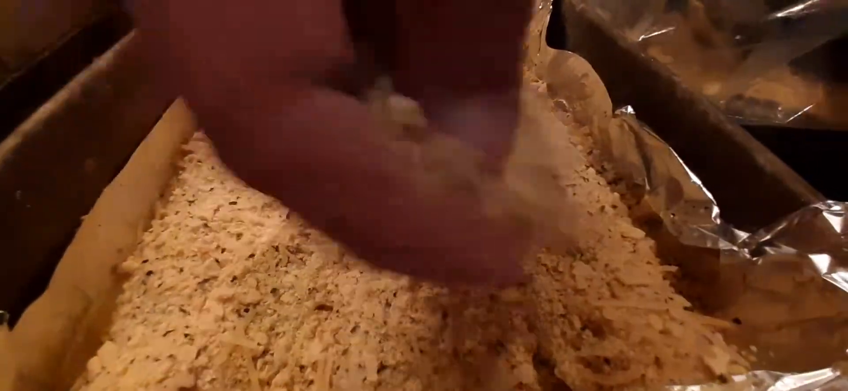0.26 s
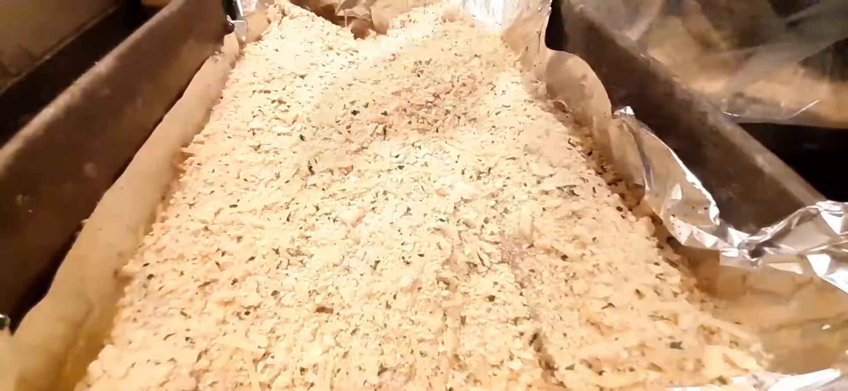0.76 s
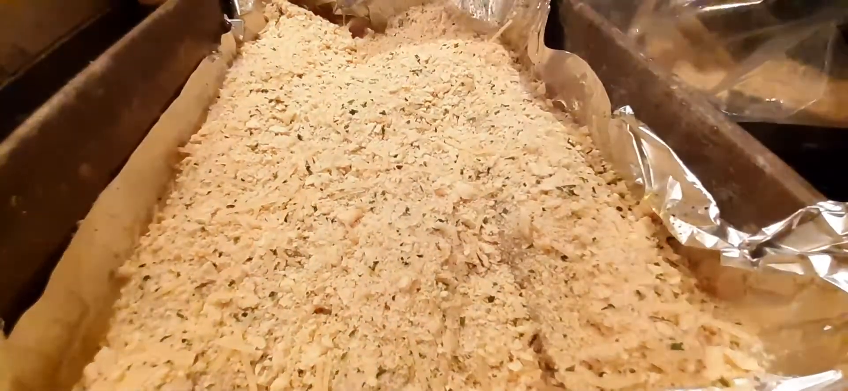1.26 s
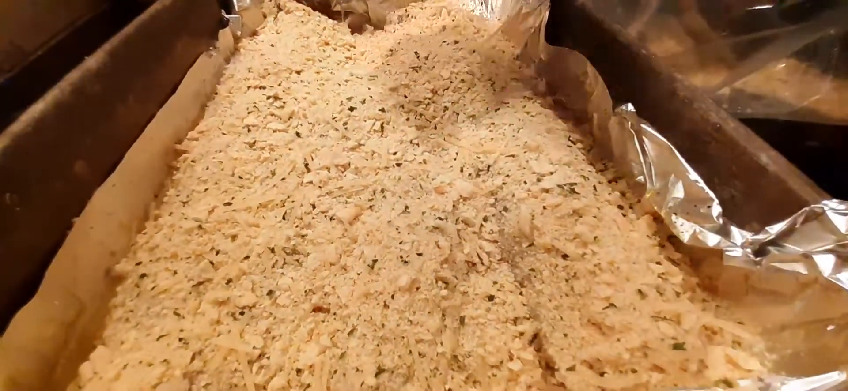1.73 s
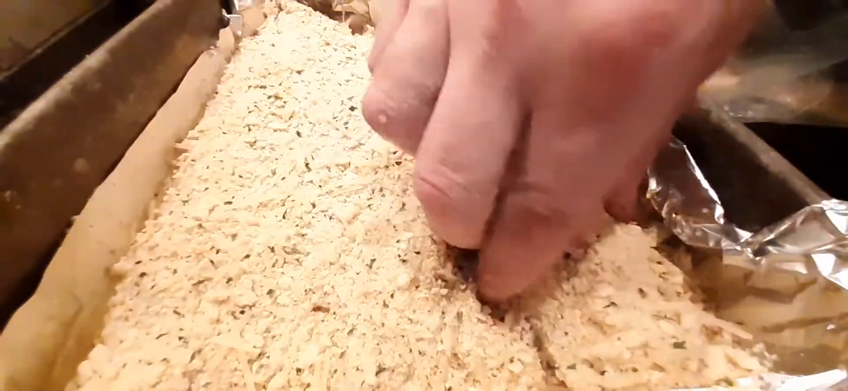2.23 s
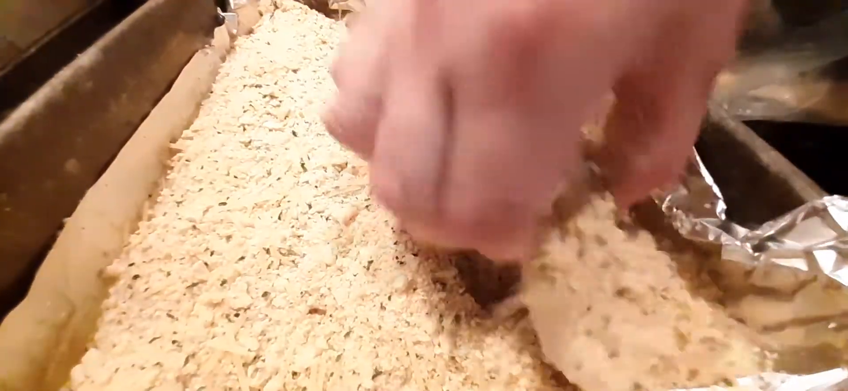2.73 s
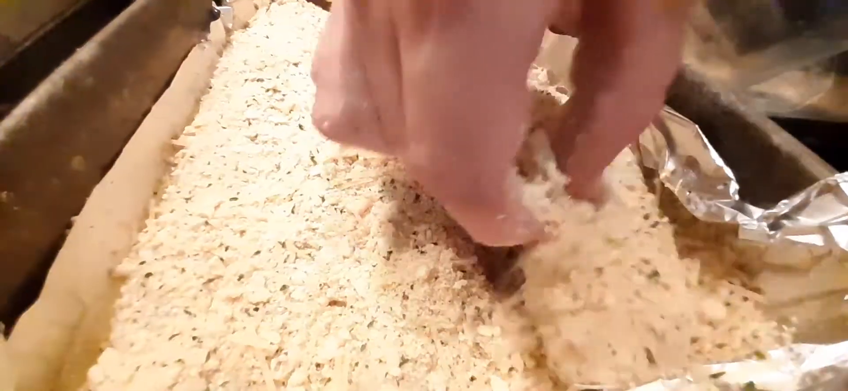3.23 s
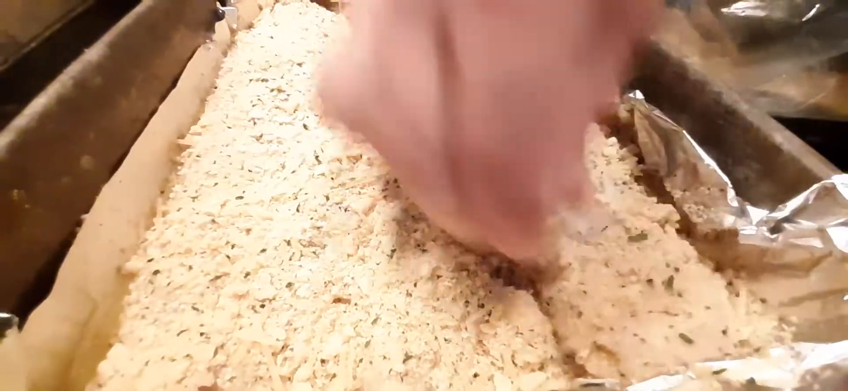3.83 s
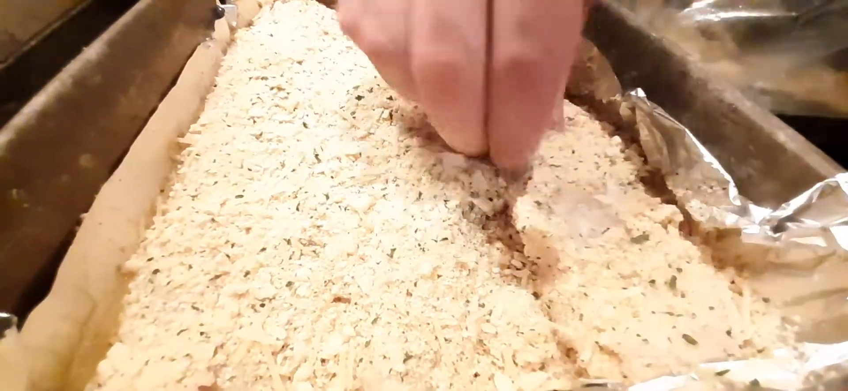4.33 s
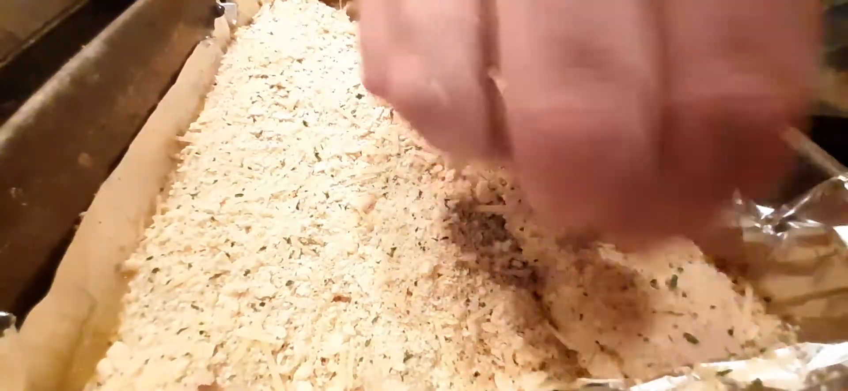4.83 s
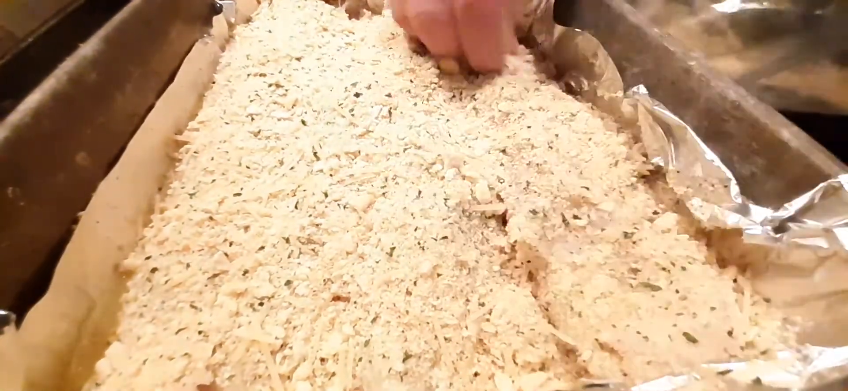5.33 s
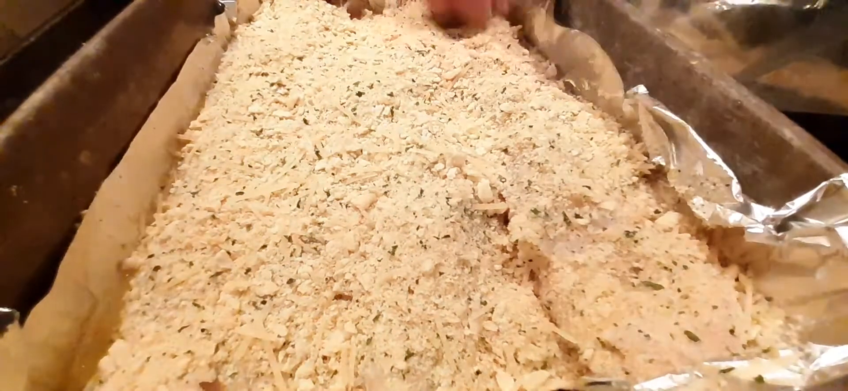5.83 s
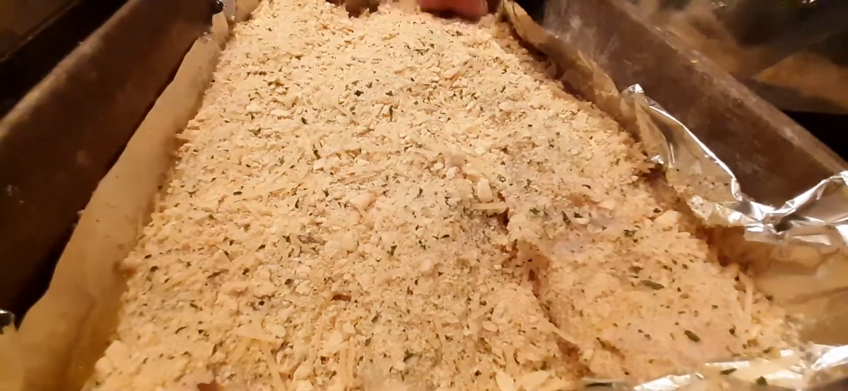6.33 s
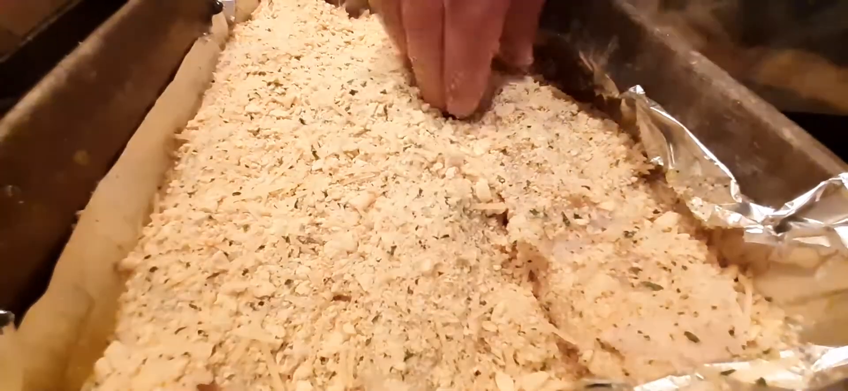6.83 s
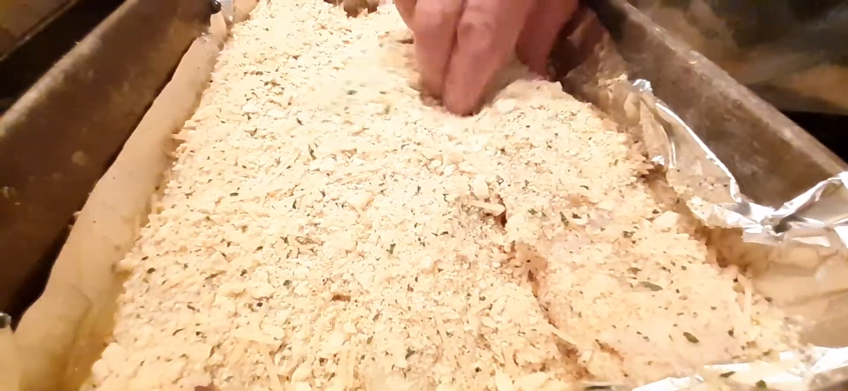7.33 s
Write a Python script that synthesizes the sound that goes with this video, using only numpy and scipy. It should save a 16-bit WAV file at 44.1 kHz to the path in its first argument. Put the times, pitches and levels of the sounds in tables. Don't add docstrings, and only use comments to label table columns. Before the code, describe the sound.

Dry crumbs crunch and crackle under a pressing hand in a foil-lined pan, with sharp snaps and pops over a low refrigerator hum.

```python
import sys
import numpy as np
from scipy import signal
from scipy.fft import rfft, irfft
from scipy.io import wavfile

SR = 44100
rng = np.random.default_rng(int(sys.argv[2]) if len(sys.argv) > 2 else 0)


def wrap_up_sound(samples):
    columns = np.atleast_2d(samples).T
    tamed = np.clip(columns, -1, 1)
    steps = np.round(tamed * 32767).astype(np.int16)
    wavfile.write(sys.argv[1], SR, steps)


def invert_db(x):
    u = np.asarray(x, float) / 20
    return 10 ** u


N = 333396
PORT_LAG, CRACK_LAG = 14, 21


def rms_one(x):
    return x / np.sqrt(np.mean(x ** 2) + 1e-20)


def in_time(rows):
    s, *columns = np.transpose(rows)
    return [np.interp(np.arange(N) / SR, s, c) for c in columns]


def at_hz(points, hz):
    pitch, value = np.transpose(points)
    return np.interp(np.log(hz), np.log(pitch), value)


def sides(pan_db):
    return invert_db(np.array([pan_db / 2, -pan_db / 2]))


def place(x, pan_db):
    return x * sides(pan_db)[:, None]


def arrive(out, sound, s, pan_db, lag):
    for port, gain in enumerate(sides(pan_db)):
        i = round(s * SR + port * lag)
        out[port, i:i + len(sound)] += gain * sound


def drift(rate):
    r = np.exp(-80 * np.pi * rate / SR)
    chance = rng.standard_normal(N // 40 + 2002)
    slow = signal.lfilter([1], [1, -2 * r, r * r], chance)[2000:]
    return np.interp(np.arange(N) / 40, np.arange(len(slow)), rms_one(slow))


def resonate(x, hz, width):
    r = np.exp(-np.pi * width / SR)
    poles = [1, -2 * r * np.cos(2 * np.pi * hz / SR), r * r]
    return signal.lfilter([(1 - r * r) / 2, 0, (r * r - 1) / 2], poles, x + 1e-18)


def colour(x, spectrum):
    hz = np.fft.rfftfreq(4096, 1 / SR) + 1
    cepstrum = irfft(np.log(invert_db(at_hz(spectrum, hz))))
    cepstrum[1:2048] *= 2
    cepstrum[2049:] = 0
    kernel = irfft(np.exp(rfft(cepstrum)))
    return signal.fftconvolve(x, [kernel / np.linalg.norm(kernel)], axes=1)[:, :N]


# (frequency [Hz], correlation [-1 to 1])
LIKENESS = [(60, 0.97), (240, 0.73), (950, -0.046), (3770, -0.3), (15000, 0.24)]


def alike_noise(hz):
    mid, side = rng.standard_normal((2, N))
    alike = np.clip(at_hz(LIKENESS, hz), -1, 1)
    return np.sqrt(1 + alike) * mid + np.sqrt(1 - alike) * side * [[1], [-1]]


# (frequency [Hz], level [dB rms])
HUM = [(60, -59.5), (120, -45.5), (204, -58), (240, -56.5), (256, -56)]
# (time [s], level [dB])
HUM_SWAY = [(0.0, -47), (1.4, -45.5), (2.0, -47.5), (2.6, -46), (3.54, -45.5), (4.15, -49), (6.2, -46.5),
            (6.67, -51), (7.56, -50)]
# (frequency [Hz], width [Hz], level [dB])
FAN_TONES = [(61.3, 7.3, -52.5), (149.9, 12, -56), (441.8, 21, -58), (734, 86, -63.5), (1543, 70, -67.5),
             (2910, 380, -69), (12800, 2500, -90)]


def fridge():
    t = np.arange(N) / SR
    lines = np.zeros(N)
    for hz, db in HUM:
        tone = np.sqrt(2) * np.sin(2 * np.pi * (hz * t + rng.random()))
        lines += invert_db(db + 1.0 * drift(4.9)) * tone
    sway_db = in_time(HUM_SWAY)[0]
    out = place(lines * invert_db(sway_db - sway_db.mean()), 4.5)
    for hz, width, db in FAN_TONES:
        tone = resonate(resonate(alike_noise(hz), hz, width), hz, width)
        out = out + place(invert_db(db) * rms_one(tone), 0.25)
    return out


# (frequency [Hz], density [dB per Hz])
AIR_SPECTRUM = [(18, -46), (30, -12.5), (70, -18), (124, -9.5), (170, -11.5), (245, -8), (374, -14),
                (437, -11), (1100, -29.5), (1540, -32), (2290, -37.5), (5040, -32), (12300, -57),
                (16000, -75)]
AIR_DB = -47.5


def air():
    low, high = [signal.butter(1, 480, kind, fs=SR) for kind in ("low", "high")]
    white = signal.lfilter(*low, alike_noise(120)) + signal.lfilter(*high, alike_noise(2250))
    swell_db = 0.7 * drift(3)
    return place(invert_db(AIR_DB + swell_db + 0.4) * rms_one(colour(white, AIR_SPECTRUM)), 0.15)


# (time [s], left-right difference [dB])
HAND_SIDE = [(0, 13), (0.4, 7), (1.3, 3), (2.2, 3), (2.8, 9), (3.7, 5), (4.1, 5), (6.3, 4), (7.56, 5.5)]


def hand_side(s):
    return np.interp(s, *np.transpose(HAND_SIDE))


# (time of the top [s], crunch [dB], brightness [dB], rise [s])
SQUEEZES = [(0.116, -39.5, -51, 0.037), (0.16, -45.5, -73, 0.048), (0.418, -34, -36, 0.029),
            (1.072, -38, -49, 0.012), (1.436, -36.5, -43.5, 0.015), (1.467, -36.5, -39, 0.0075),
            (2.009, -45.5, -61, 0.029), (2.652, -31, -42.5, 0.057), (2.821, -24.5, -31.5, 0.012),
            (2.986, -28, -36, 0.015), (3.157, -26.5, -34.5, 0.025), (3.268, -43, -46, 0.03),
            (3.332, -35, -45, 0.028), (3.396, -68, -48, 0.025), (3.658, -31, -34.5, 0.064),
            (3.796, -36, -48, 0.021), (4.966, -48, -55, 0.01), (5.141, -52, -86, 0.005),
            (5.862, -27.5, -38, 0.0084), (6.335, -19, -31.5, 0.01), (7.26, -43.5, -45.5, 0.032),
            (7.361, -38.5, -41, 0.013), (7.448, -38.5, -43, 0.017)]
# (time of the top [s], crunch [dB], brightness [dB], fall [s])
BRUSHES = [(0.08, -42, -46, 0.014), (0.373, -44, -47, 0.011), (1.034, -32, -38, 0.017),
           (1.264, -46, -45.5, 0.017), (1.39, -61, -45, 0.014), (1.727, -52.5, -61, 0.088),
           (2.139, -40.5, -49.5, 0.048), (2.251, -35, -40.5, 0.0098), (3.841, -55, -57, 0.014),
           (4.222, -47, -52, 0.032), (4.474, -47, -56, 0.026), (4.68, -46, -52, 0.015),
           (4.906, -30, -37, 0.011), (5.322, -48.5, -54, 0.062), (5.605, -42, -48, 0.047),
           (5.874, -27, -32, 0.014), (5.92, -42, -52, 0.027), (6.102, -20.5, -28, 0.0091),
           (6.117, -38, -39, 0.0062), (6.14, -47, -59, 0.079), (6.341, -30.5, -31, 0.019),
           (6.72, -57, -68, 0.12), (6.854, -38.5, -48.5, 0.059), (6.975, -26.5, -36.5, 0.046),
           (7.022, -52, -53, 0.018), (7.536, -44, -53, 0.023)]


def pushes():
    squeezes = [(*row, 0.008 + 0.059 * row[3]) for row in SQUEEZES]
    brushes = [(*row[:3], 0.0076, row[3]) for row in BRUSHES]
    return squeezes + brushes


# (time [s], peak [dB], brightness [dB], ring [Hz])
SNAPS = [(0.0727, -30, -45.5, 3460), (0.098, -20, -29, 3650), (0.295, -29.5, -38, 4160),
         (0.36, -35, -23, 1500), (1.0307, -24, -43, 1900), (1.256, -23, -48, 4500), (1.388, -34, -45, 3950),
         (1.436, -38, -26.5, 3970), (1.464, -40, -38, 1860), (2.19, -29, -46, 3350),
         (2.2293, -19, -39, 5000), (2.271, -21.5, -38, 4700), (2.3327, -23.5, -38, 2950),
         (2.4502, -24, -22.5, 1890), (3.1465, -29, -32, 1870), (3.6084, -27, -37, 1900),
         (4.062, -28, -60, 4540), (4.899, -33, -35, 2030), (4.9672, -23, -30, 5200), (5.22, -31, -42, 1710),
         (5.61, -30, -38, 3280), (5.856, -18, -40, 4020), (5.8639, -19, -23.5, 2050),
         (6.0947, -21.5, -31, 2250), (6.329, -17, -15.5, 1680), (6.9672, -35, -35, 1980),
         (6.9725, -15.5, -28, 3340), (7.444, -30, -30.5, 2870), (7.4798, -26.5, -53, 2600),
         (0.362, -12.5, -42, 4440)]
# (time [s], peak [dB], brightness [dB])
POPS = [(0.0698, -32.5, -53), (0.393, -24, -29), (0.435, -21.5, -24), (1.051, -36, -44), (1.077, -26, -37),
        (2.436, -29.5, -41), (2.5155, -33, -38), (2.5592, -26, -39), (2.584, -23, -53), (2.656, -32, -52),
        (2.727, -28, -55), (2.803, -17, -56), (2.8916, -34, -59), (2.934, -30, -46), (2.9505, -22.5, -53),
        (2.985, -34, -28), (3.031, -31, -50), (3.066, -16.5, -31), (3.123, -46, -53), (3.3098, -32, -55),
        (3.3737, -48, -43), (3.3975, -27.5, -41), (3.451, -31, -41), (3.5445, -44, -30.5),
        (3.8625, -35, -32.5), (3.9995, -39, -48), (6.318, -37, -51), (6.7165, -46, -68), (7.246, -36, -62),
        (7.358, -22.5, -45)]
POP_HZ, POP_SPREAD = 1930, 0.07


def breaks():
    chance = rng.standard_normal((len(SNAPS) + len(POPS), 2))
    pops = [(*row, POP_HZ * (1 + POP_SPREAD * c)) for row, c in zip(POPS, chance[:, 0])]
    side_db = -3 * chance[:, 1]
    side_db[len(SNAPS):] += 2.5
    return [(*row, hand_side(row[0]) + d) for row, d in zip([*SNAPS, *pops], side_db)]


def settle(strength, share_db, t60):
    r = invert_db(-60 / (t60 * SR))
    return strength + invert_db(share_db) * signal.lfilter([1 - r], [1, -r], strength)


def fractures(per_s, spread_db, alike):
    size_db = spread_db * np.minimum(rng.exponential(1, (2, N)), 5)
    sizes = invert_db(size_db) * rng.choice([-1, 1], (2, N))
    left, other = rms_one(sizes * (rng.random((2, N)) < per_s / SR))
    right = alike * np.roll(left, PORT_LAG) + np.sqrt(1 - alike ** 2) * other
    return np.array([left, right])


# (time [s], crunch [dB])
PRESS = [(0.0, -56), (0.15, -60), (0.51, -70.5), (1.43, -57.5), (1.77, -67), (2.12, -57), (2.32, -47.5),
         (2.65, -38), (2.78, -44), (3.03, -44), (3.26, -59.5), (3.51, -39), (3.7, -68.5), (4.48, -64.5),
         (6.55, -88), (6.93, -46), (7.07, -64.5), (7.56, -50)]
# (time [s], peak [dB])
TICKS = [(0.063, -38), (0.114, -18.5), (0.135, -23), (0.162, -28), (0.176, -31), (0.188, -42), (0.218, -46),
         (0.239, -36), (0.267, -42), (0.273, -35), (0.5482, -44), (0.939, -40), (1.31, -35), (1.3547, -38),
         (1.4185, -38), (1.533, -33), (1.724, -43), (2.1365, -51), (2.3151, -46), (2.468, -37),
         (2.7681, -37), (3.1794, -32), (3.685, -45), (3.806, -31), (3.84, -25.5), (4.8493, -39.5),
         (5.377, -36), (5.595, -38), (5.641, -34.5), (6.311, -36), (6.4031, -29), (6.5275, -45),
         (6.716, -55), (6.85, -30), (7.533, -30)]


def strengths(broken):
    press_db = in_time(PRESS)[0]
    low, high = place(invert_db(press_db - 8.5), 4.9), place(invert_db(press_db - 7), 4.9)
    for s, crunch_db, bright_db, rise, fall in pushes():
        i = np.arange(max(round((s - 0.2) * SR), 0), min(round((s + 0.4) * SR), N))
        before, past = (s - i / SR) / max(rise, 0.002), (i / SR - s) / max(fall, 0.002)
        away = np.where(i < s * SR, before, past)
        shape = place(invert_db(-6 * away ** 1.8), hand_side(s))
        low[:, i] += invert_db(crunch_db - 10.0) * shape
        high[:, i] += invert_db(bright_db - 0.36) * shape
    clumps = 1.5 * drift(30) + 1.1 * drift(200)
    low = settle(low, -6.0, 0.42) * invert_db(clumps + 1.6 * drift(110))
    high = settle(high, -9.0, 0.47) * invert_db(clumps + 2 * drift(78))
    after = np.arange(SR // 20) / SR
    for s, peak_db, bright_db, hz, side_db in broken:
        i = round(s * SR)
        shape = place(invert_db(-60 * after[:N - i] / 0.029), side_db)
        low[:, i:i + len(after)] += invert_db(peak_db - 17.0) * shape
        high[:, i:i + len(after)] += invert_db(bright_db - 5.0) * shape
    for s, peak_db in TICKS:
        i = round(s * SR)
        shape = invert_db(peak_db - 6.0 - 60 * after[:N - i] / 0.014)
        high[:, i:i + len(after)] += place(shape, hand_side(s))
    return low, high


# (frequency [Hz], density [dB per Hz])
CRUNCH = [(290, -28.5), (500, -5), (1130, -2.5), (1540, -1), (1830, -3), (2750, -0.5), (6000, -23),
          (7800, -28), (13200, -120)]
# (frequency [Hz], density [dB per Hz])
FIZZ = [(2650, -26.5), (4500, 0.5), (8540, -0.5), (12400, 0), (15100, -2), (15900, -10)]
# (frequency [Hz], width [Hz], gain [dB])
PAN_BODY = [(1430, 47, 6), (2250, 140, 3), (3300, 510, 2), (4020, 560, 10)]
# (time [s], ring [dB], weight of the hand [dB])
HOLLOW = [(0.15, -13, -13), (.36, 7, 6.5), (.44, -1, -7), (.48, 5, 7), (1.04, 1, 3), (1.3, -7, 6.5),
          (2.3, -10, 2.5), (2.58, -1.5, 0.5), (3, 5, 0), (3.2, 3, 0.5), (3.45, -6, 2), (3.66, -5, 6),
          (4.2, -1.5, 6), (5.8, -4.5, 4), (6.15, 1, 6.5), (6.4, -1, 4), (7, -7.5, 1), (7.56, -4, 2.5)]
HOLLOW_HZ, HOLLOW_WIDTH_HZ, WEIGHT_HZ = 1854, 213, 1130


def crumbs(broken):
    low, high = strengths(broken)
    grains = fractures(6000, 2.53, alike=0.1)
    body = colour(grains * low, CRUNCH)
    ring_db, weight_db = in_time(HOLLOW)
    bass = signal.filtfilt(*signal.butter(2, WEIGHT_HZ, fs=SR), body)
    body = body + (invert_db(weight_db) - 1) * bass
    hollow = place(invert_db(ring_db + 7.0) * resonate(body, HOLLOW_HZ, HOLLOW_WIDTH_HZ), -4.5)
    pan = sum((invert_db(db) - 1) * resonate(body, hz, width) for hz, width, db in PAN_BODY)
    fine = rms_one(grains * np.abs(grains) ** 0.17)
    fizz = place(colour(fine * high, FIZZ), -2)
    return invert_db(-3.0) * (body + hollow + pan) + fizz


KITCHEN_T60_S, WALL_CUT_HZ, KITCHEN_DB = 0.31, 3800, -12.5


def kitchen(x):
    after = np.arange(SR // 2) / SR
    echoes = rng.standard_normal((2, 2, SR // 2)) * (1 - np.exp(-after / 0.00036))
    low, high = [signal.butter(1, WALL_CUT_HZ, kind, fs=SR) for kind in ("low", "high")]
    dull = signal.lfilter(*low, echoes[0]) * invert_db(-60 * after / KITCHEN_T60_S)
    bright = signal.lfilter(*high, echoes[1]) * invert_db(-60 * after / (0.42 * KITCHEN_T60_S))
    tail = dull + bright
    return signal.fftconvolve([x, x], tail / np.linalg.norm(tail[0]), axes=1)[:, :N]


def snaps(broken):
    out, after = np.zeros((2, N + SR)), np.arange(SR // 40) / SR
    for s, peak_db, bright_db, hz, side_db in broken:
        where, overtone = rng.random(2)
        ring = np.sin(2 * np.pi * hz * after)
        ring += 0.5 * np.sin(2 * np.pi * hz * (1.544 + 0.35 * overtone) * after)
        ring *= invert_db(peak_db - 4 - 60 * after * hz / 18)
        arrive(out, ring, s + 0.0007, side_db, PORT_LAG * (1.2 + 0.7 * where))
    return out[:, :N]


# (time [s], peak [dB],
# ring [Hz], decay [cycles])
CRACKS = [(0.3613, -12, 1390, 9.2), (0.372, -22, 1810, 11), (0.379, -24, 1750, 18), (0.399, -26, 1850, 22),
          (0.4104, -23, 1810, 14), (0.4152, -35, 1830, 20), (0.535, -38, 1880, 16), (0.6135, -38, 1810, 12),
          (1.027, -28, 1590, 14), (1.4383, -36, 3960, 12), (1.508, -30, 3400, 12), (1.643, -46, 1050, 12),
          (1.6716, -42, 1810, 12), (2.4957, -30, 1290, 11), (2.585, -14.5, 1840, 20),
          (2.6034, -25, 1900, 15), (2.6518, -11.5, 1730, 10), (2.684, -30, 1950, 12),
          (2.7227, -18.5, 1810, 7.3), (2.813, -20, 1790, 22), (2.822, -23, 2010, 10),
          (2.9738, -19, 1880, 14), (2.9888, -22, 2180, 12), (2.993, -22, 1680, 11), (3.059, -25, 1930, 15),
          (3.1474, -26, 1850, 11), (3.158, -22, 1830, 13), (3.1822, -17, 1440, 5.1),
          (3.4256, -30, 4950, 12), (3.6324, -33, 2920, 12), (3.6548, -18.5, 1960, 18),
          (3.784, -29, 1840, 14), (4.9003, -28, 2060, 18), (4.915, -26, 1930, 18), (4.968, -31, 3900, 13),
          (5.1387, -35, 4070, 14), (5.8639, -17.5, 1620, 14), (5.879, -12.5, 1770, 10),
          (5.8866, -20, 1780, 12), (6.1004, -17, 2180, 18), (6.1064, -26, 2250, 12),
          (6.1344, -22.5, 1840, 14), (6.147, -32, 1920, 12), (6.196, -27, 1150, 12),
          (6.322, -19.5, 1770, 16), (6.4034, -28, 1850, 12), (6.443, -30, 1880, 11),
          (6.7955, -37, 2830, 15), (6.9634, -21, 1930, 12), (6.9836, -20, 2220, 15),
          (6.9964, -21, 1920, 12), (7.0136, -24, 1900, 12), (7.0255, -22, 1800, 12),
          (7.4061, -31, 1840, 12), (7.5335, -30, 2500, 11),
          (0.1, -26, 5200, 14), (0.143, -27, 3520, 15), (0.241, -31, 3000, 9.7), (0.364, -14, 3240, 10),
         (1.053, -17, 2960, 14), (2.525, -31, 2200, 10), (2.652, -15, 3360, 10), (3.07, -23, 4500, 10),
         (3.614, -15, 2840, 16), (3.626, -24, 3100, 14), (3.642, -21, 4000, 14), (3.661, -18.5, 1460, 14),
         (3.667, -21, 2000, 16), (5.111, -32, 3040, 14), (5.367, -33, 3020, 20), (6.332, -20, 4800, 14)]


def cracks():
    out, after = np.zeros((2, N + SR)), np.arange(SR // 40) / SR
    for s, peak_db, hz, cycles in CRACKS:
        turns = hz * after
        octave = 0.19 * np.cos(2 * np.pi * 2.0 * turns) * invert_db(-6 * turns)
        decay_db = -60 * (turns / np.clip(cycles, 2, 40)) ** 1.46
        ring = invert_db(peak_db - 6 + decay_db) * (np.cos(2 * np.pi * turns) + octave)
        arrive(out, ring, round(s * SR) / SR, hand_side(s), CRACK_LAG)
    band = signal.butter(3, [700, 6000], "band", fs=SR, output="sos")
    return signal.sosfilt(band, out[:, :N] + 1e-18)


# (time [s], peak [dB], centre [Hz])
CLICKS = [(0.3611, -22, 4560), (2.2293, -22, 5140), (2.3321, -38, 2860), (2.4513, -10, 12900),
          (2.4674, -29, 3730), (2.652, -23, 3190), (2.8214, -28, 3030), (3.3604, -34, 12700),
          (3.3732, -32, 4790), (3.397, -26, 3000), (3.4251, -35, 4950), (3.4804, -15, 11400),
          (3.5428, -21, 6170), (3.5804, -30, 3030), (3.6067, -24, 2620), (3.6262, -18, 2950),
          (3.6411, -26, 3030), (3.6615, -14, 3950), (3.9988, -23.5, 3200), (4.062, -38, 3080),
          (4.9659, -15.5, 5400), (5.221, -34, 2620), (6.3295, -16, 3530)]


def clicks():
    out, after = np.zeros((2, N + SR)), np.arange(SR // 200) / SR
    for s, peak_db, hz in CLICKS:
        ring = invert_db(peak_db - 4 - 60 * hz * after / 9.4) * np.cos(2 * np.pi * hz * after)
        arrive(out, -ring, s + 0.0009, hand_side(s), CRACK_LAG)
    return signal.sosfilt(signal.butter(1, 900, "high", fs=SR, output="sos"), out[:, :N] + 1e-18)


# (time [s], peak [dB], pitch [Hz], t60 [s])
KNOCKS = [(0.362, -32.5, 830, 0.015), (1.074, -46, 840, 0.048), (3.608, -33.5, 403, 0.03),
          (3.66, -35.5, 830, 0.033), (4.0, -46.5, 710, 0.018), (5.111, -45.5, 500, 0.029),
          (5.138, -45, 700, 0.017), (5.22, -46, 705, 0.02), (5.862, -39, 550, 0.16),
          (6.098, -32.5, 570, 0.067), (6.33, -31, 730, 0.013), (6.716, -47, 940, 0.02),
          (6.721, -51, 278.7, 0.099), (6.965, -32, 550, 0.18), (6.998, -38, 613, 0.077)]
# (time [s], peak [dB], pitch [Hz])
THUDS = [
    (1.074, -22.5, 770),
    (5.864, -33, 237),
    (6.096, -57, 240),
    (6.331, -21, 230),
    (6.969, -53, 240),
]


def knocks():
    out, after = np.zeros(N), np.arange(SR // 5) / SR
    for s, peak_db, hz, t60 in KNOCKS:
        puff = rng.standard_normal(len(after)) * invert_db(-60 * after / t60) * (1 - np.exp(-after / 0.00029))
        puff = resonate(resonate(puff, hz, 0.18 * hz), hz, 0.5 * hz) + 0.75 * resonate(puff, 0.71 * hz, 280)
        i = round(s * SR)
        out[i:i + len(after)] += invert_db(peak_db + 6.0) * puff / np.abs(puff).max()
    for s, peak_db, hz in THUDS:
        note = np.sin(2 * np.pi * hz * after) * (1 - np.exp(-after / 0.0022))
        i = round(s * SR)
        out[i:i + len(after)] += invert_db(peak_db - 60 * after / 0.038) * note
    out = signal.sosfilt(signal.butter(2, 2500, fs=SR, output="sos"), out + 1e-18)
    return place(out, 4.0)


# (time [s], pitch [Hz], level [dB])
SQUEAKS = [
    [(.96, 10900, -80), (1.0, 11900, -63), (1.03, 12300, -66), (1.09, 11800, -60), (1.13, 11500, -74)],
    [(1.16, 12700, -70), (1.19, 13500, -68), (1.215, 13100, -58), (1.25, 14500, -71)],
    [(1.55, 15800, -72), (1.575, 15000, -66), (1.6, 13400, -64)],
    [(5.69, 12700, -66), (5.73, 13800, -68)],
    [(5.73, 14900, -70), (5.76, 15150, -65), (5.78, 15400, -70)],
    [(3.69, 15100, -66), (3.72, 14200, -64), (3.76, 13200, -64), (3.8, 12900, -62)],
    [(3.7, 12000, -68), (3.76, 11100, -66), (3.82, 11300, -68)],
    [(3.96, 13500, -77), (3.99, 12800, -74)],
    [(6.04, 11800, -80), (6.08, 11550, -79)],
    [(5.74, 13400, -62), (5.78, 12800, -63), (5.81, 13400, -64), (5.85, 14400, -60)],
    [(5.92, 12700, -67.5), (5.96, 13300, -62), (6.0, 13300, -68), (6.07, 13300, -67)],
    [(6.16, 12800, -66), (6.2, 13050, -60), (6.22, 13500, -59), (6.26, 12450, -60), (6.285, 12800, -60),
     (6.305, 11600, -66)],
]


def squeaks():
    out, t = np.zeros(N), np.arange(N) / SR
    for rows in SQUEAKS:
        hz, level_db = in_time(rows)
        fade = np.clip(np.minimum(t - rows[0][0], rows[-1][0] - t) / 0.0048, 0, 1)
        whistle = np.sin(2 * np.pi * np.cumsum(hz + 60 * drift(70)) / SR)
        out += fade * invert_db(level_db + 2.0 + 3.5 * drift(60)) * whistle
    return place(out, 2.3)


# (time [s], peak [dB])
SPECKS = [(1.376, -30), (1.383, -24), (1.418, -21.5), (1.599, -39), (1.624, -40), (1.66, -45), (1.751, -37),
          (1.781, -43), (1.83, -38), (1.87, -51), (1.725, -47), (3.838, -40), (4.9302, -32), (5.379, -41),
          (7.248, -22.5), (7.446, -16.5), (7.532, -34)]
SPECK_HZ, SPECK_T60_S = 10900, 0.02


def specks():
    out, after = np.zeros((2, N + SR)), np.arange(SR // 40) / SR
    for s, peak_db in SPECKS:
        i = round(s * SR)
        hiss = invert_db(peak_db - 60 * after / SPECK_T60_S) * rng.standard_normal((2, len(after)))
        out[:, i:i + len(after)] += place(hiss, hand_side(s))
    return signal.sosfilt(signal.butter(2, SPECK_HZ, "high", fs=SR, output="sos"), out[:, :N] + 1e-18)


def scene():
    broken = breaks()
    near = crumbs(broken) + snaps(broken) + cracks() + clicks() + knocks() + squeaks() + specks()
    return fridge() + air() + near + invert_db(KITCHEN_DB) * kitchen(near[0])


def low_pass(x):
    return signal.sosfilt(signal.butter(12, 16810, fs=SR, output="sos"), x)


def record(dry):
    mix = 0.4 * np.tanh(dry / 0.4)
    mix = signal.sosfilt(signal.butter(6, 47, "high", fs=SR, output="sos"), mix)
    mix = signal.sosfilt(signal.ellip(12, 1, 85, 15800, fs=SR, output="sos"), mix)
    return low_pass(mix)


dry = scene()
out = record(dry)
wrap_up_sound(out)
```